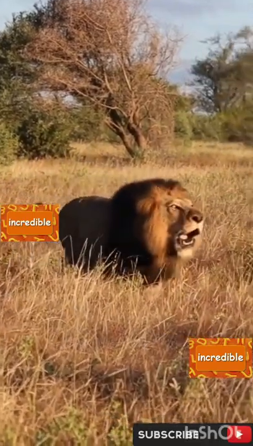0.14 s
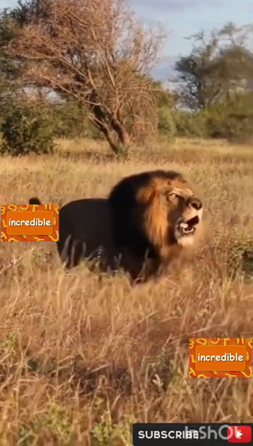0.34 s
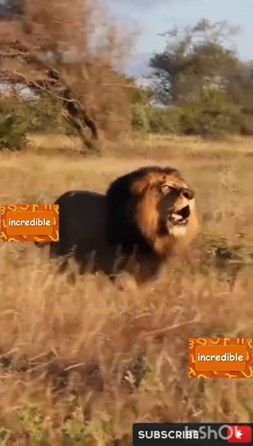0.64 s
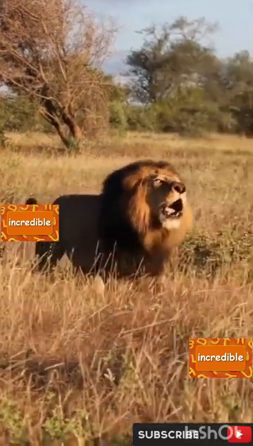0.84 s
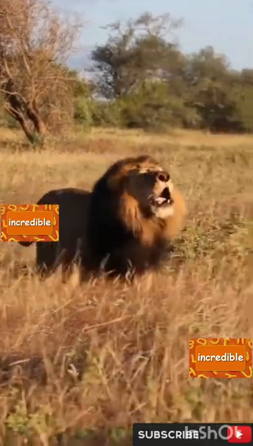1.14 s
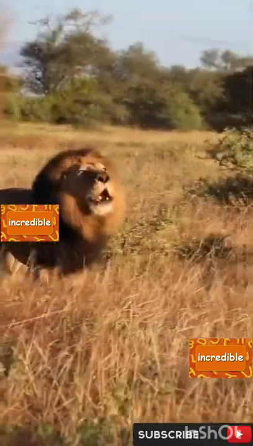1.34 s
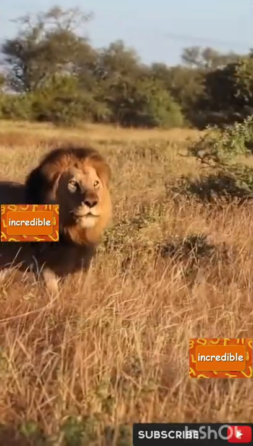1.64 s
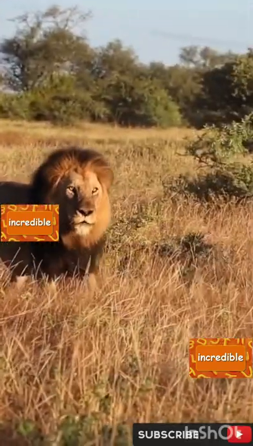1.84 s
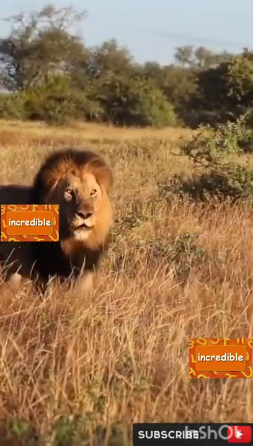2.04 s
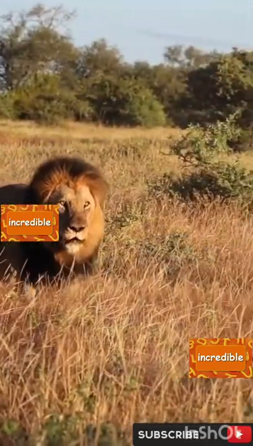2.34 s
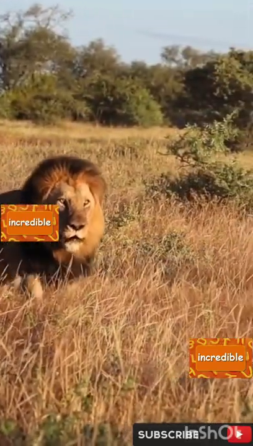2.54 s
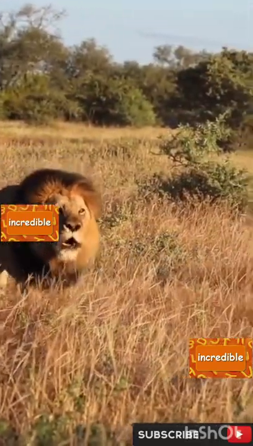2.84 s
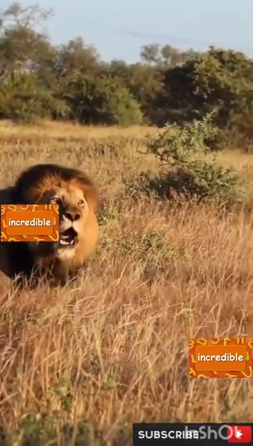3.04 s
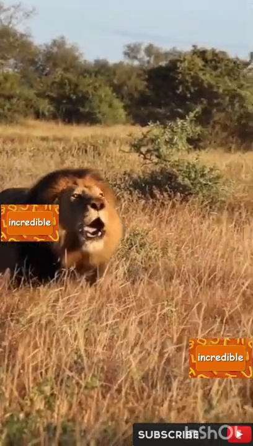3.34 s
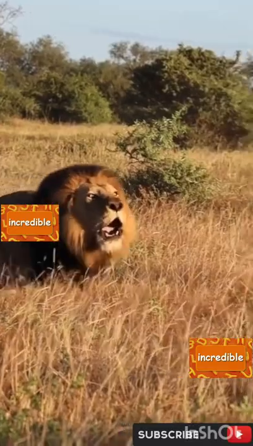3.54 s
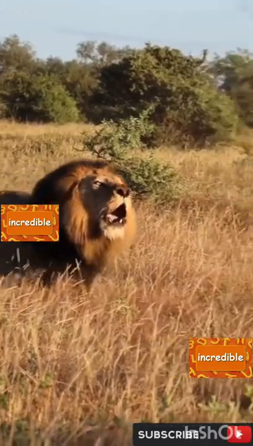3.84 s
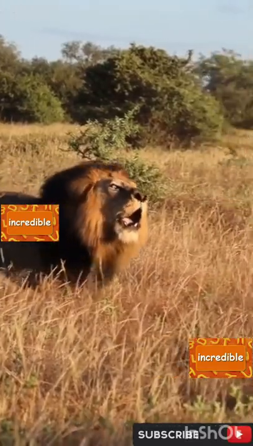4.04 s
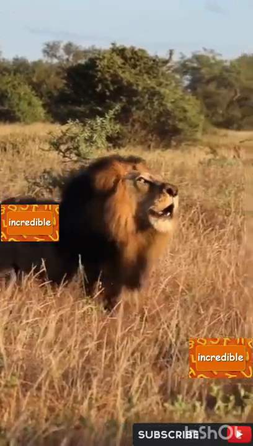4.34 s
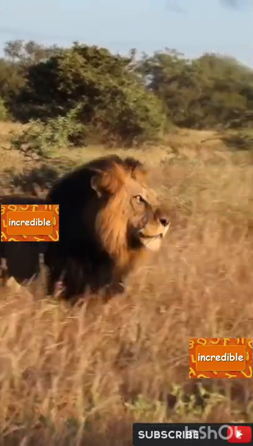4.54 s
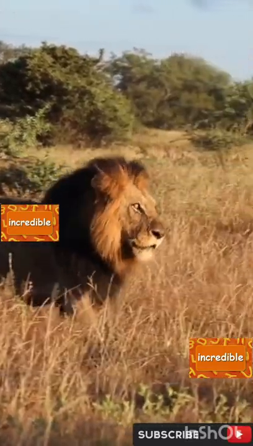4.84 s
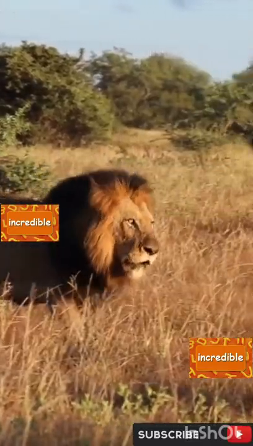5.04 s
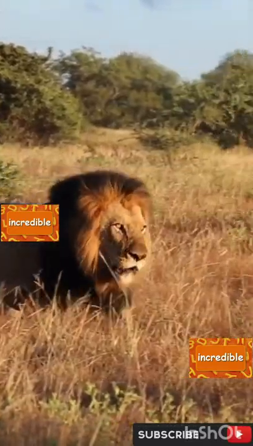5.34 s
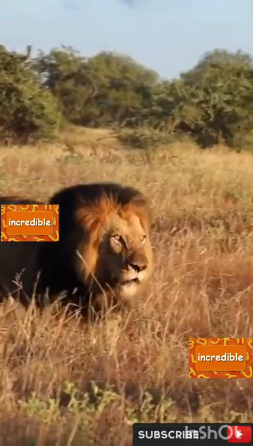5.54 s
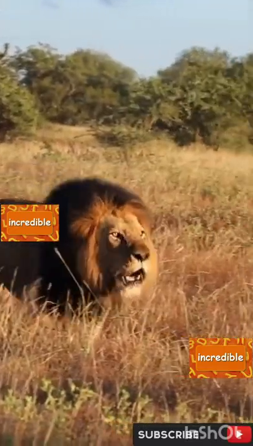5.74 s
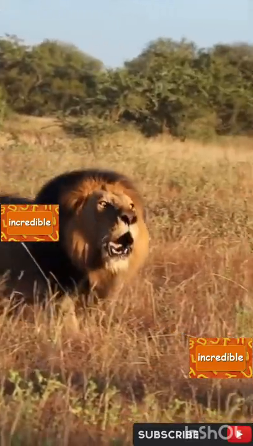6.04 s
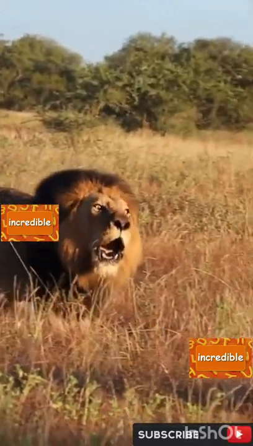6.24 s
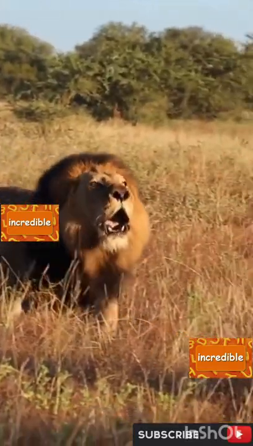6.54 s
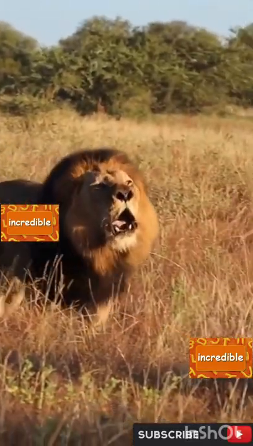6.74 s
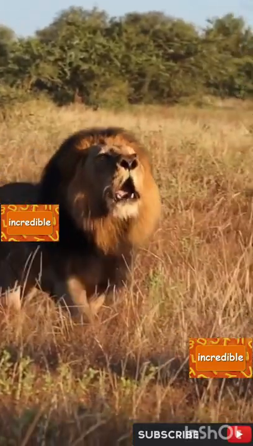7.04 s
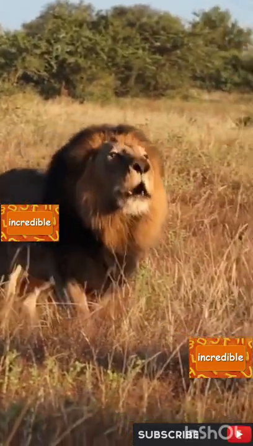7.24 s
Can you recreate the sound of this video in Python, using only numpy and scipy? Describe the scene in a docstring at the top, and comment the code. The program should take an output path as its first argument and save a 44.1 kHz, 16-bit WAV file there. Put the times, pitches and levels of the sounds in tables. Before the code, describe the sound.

Deep lion roars swell from a hollow moan to rasping growls over a quiet grassy plain, with faint bird whistles and dry grass rustling.

```python
"""Lion roaring in open grassland

A male lion some metres from a stereo microphone gives three roars and shorter grunts. Each roar has a clean
moan of steady partials, rising first, that breaks up and sinks into a hoarse chest growl: uneven slaps of
the vocal folds and gusts of air ring a long throat. Dry grass rustles as short swells of grainy noise,
birds are faint gliding sine tones, a small hollow body clicks, and soft air lies over the plain."""
import sys
import numpy as np
from scipy import signal
from scipy.fft import rfft, irfft, next_fast_len
from scipy.io import wavfile
from scipy.ndimage import uniform_filter1d

SR = 44100
rng = np.random.default_rng(int(sys.argv[2]) if len(sys.argv) > 2 else 0)


def bounce(signal):
    """Save signal as a 16-bit WAV file at the path given by the first command-line argument."""
    frames = np.transpose(np.atleast_2d(signal))
    limited = np.clip(frames, -1, 1)
    pcm = np.round(limited * 32767).astype(np.int16)
    wavfile.write(sys.argv[1], SR, pcm)


N = 325458
TIME = np.arange(N) / SR
STEPS = TIME[::SR // 1000]  # the controls of the voice are worked out about once a millisecond
FFT_SIZE = next_fast_len(N + SR // 4, real=True)
FFT_HZ = np.arange(FFT_SIZE // 2 + 1) * SR / FFT_SIZE

# Path of each moan, one list a moan: time_s, pitch_hz, fundamental_db, overtones_db (before the trims below)
MOANS = [
    [(.17, 194, -50, -64), (.32, 218.5, -40.5, -50), (.444, 232.5, -32.5, -45.5), (.53, 229.5, -31, -46),
     (.635, 237.5, -21.5, -33), (.765, 240.7, -16, -33), (.824, 234.5, -12.5, -27), (.89, 226, -11.5, -45),
     (.96, 223, -13.5, -36), (1.04, 200, -24.5, -37.5)],
    [(2.88, 197, -16, -58), (2.97, 223, -42, -47), (3.17, 247, -30, -45), (3.27, 244, -25.5, -40),
     (3.39, 236.5, -19, -32), (3.46, 241.5, -18, -35), (3.64, 239.7, -15, -27.5), (3.73, 230.5, -9.5, -37),
     (3.83, 231, -20.5, -38.5), (3.91, 220, -15.5, -47.5)],
    [(5.79, 223, -32, -43), (5.87, 234, -31, -46.5), (5.98, 238, -33, -44), (6.1, 233.5, -26.5, -41),
     (6.26, 237, -18, -35), (6.42, 243, -17, -35), (6.53, 242, -13.5, -31), (6.66, 226, -11, -35.5),
     (6.77, 218, -22.5, -40), (6.86, 200, -12, -49)],
]
# A second oscillation that joins in the middle roar: time_s, level_db (relative)
SECOND_SWING = [(3.36, -50), (3.42, -3), (3.52, -9.5), (3.58, -9), (3.66, -5), (3.72, -32.5)]
SECOND_SWING_HZ = 152
# Lines it adds above the partials: partial (number), level_db (relative)
SIDEBANDS = [(1, -17), (2, -28.5), (3, -68), (4, -47.5), (5, -72), (6, -74), (7, -31), (8, -56), (9, -35),
             (10, -43), (12, -43.5)]
# Flares of the octave as the voice cracks: time_s, half_length_s, level_db (added)
OCTAVE_FLARES = [(.9, .09, 10.5), (1.025, .045, 18), (2.898, 0.045, 11.5), (6.381, 0.033, 13.5),
                 (6.54, .04, 8)]
# the octave grows with the fundamental (dB per dB), and more under strain
OCTAVE_DB, OCTAVE_GROWTH, OCTAVE_STRAIN_DB = -23, 0.52, 3
# trims on the overtones; strain dulls the highest, which also arrive after the rest
MIDDLE_DB, BRIGHT_DB, STRAIN_DULLS_DB = 1.5, 0.24, 2
BRIGHT_LATE_DB, BRIGHT_RISE_S = 5, 0.13
JAW_SHUT_HZ, JAW_OPEN_HZ = 2170, 2550  # a mouth resonance rises and falls once in each moan


def moan(table, growl_db, jitter=0.0019, strain_jitter=0.01374, shimmer_db=0.55, fade_s=0.04):
    """The folds swing evenly: clean partials that waver and smear once the growl sets in."""
    hz, first_db, overtones_db = curves(table)
    start_s, end_s = table[0][0], table[-1][0]
    along = ramp(start_s, end_s - start_s, TIME)
    jaw_hz = JAW_SHUT_HZ + (JAW_OPEN_HZ - JAW_SHUT_HZ) * np.sin(np.pi * along)
    second_db, = curves(SECOND_SWING)
    strain = np.clip(undb(growl_db + 29) + 0.26 * undb(second_db), 0, 1.5)

    flare_db = sum(db * np.exp(-((TIME - s) / half) ** 2) for s, half, db in OCTAVE_FLARES)
    octave_db = OCTAVE_DB + OCTAVE_GROWTH * first_db + OCTAVE_STRAIN_DB * strain + flare_db
    late_db = BRIGHT_LATE_DB * np.exp(-np.maximum(TIME - start_s, 0) / BRIGHT_RISE_S)
    bright_db = overtones_db + BRIGHT_DB - STRAIN_DULLS_DB * strain - late_db

    gate = np.clip(np.minimum(TIME - start_s, end_s - TIME) / fade_s + .5, 0, 1)
    on = gate > 0
    wavering_hz = hz * (1 + (jitter + strain_jitter * strain) * walk(260))
    phase = 2 * np.pi * np.cumsum(wavering_hz)[on] / SR
    push = np.clip((first_db[on] + 32.0) / 10, 0, 1)
    out = np.zeros(N)
    # partial 1, partial 2, partials 3-6 and 7-15 each keep a level of their own
    groups = np.split(np.arange(1, 16), [1, 2, 6])
    for partials, db in zip(groups, (first_db, octave_db, overtones_db + MIDDLE_DB, bright_db)):
        k = partials[:, None]
        weight = partial_gains(k, hz[on], push, jaw_hz[on], on)
        stack = (weight * np.sin(k * phase)).sum(0) / np.sqrt((weight ** 2).sum(0) / 2)
        shimmer = shimmer_db * np.log(partials[0] + .5) * walk(65)
        out[on] += stack * undb(db + shimmer)[on]

    # the second oscillation beats with the first
    second = 2 * np.pi * np.cumsum(SECOND_SWING_HZ * (1 + 0.0338 * walk(90)))[on] / SR
    lines = sum(undb(db) * np.sin(round(k) * phase + second) for k, db in SIDEBANDS)
    out[on] += 1.65 * undb(second_db[on]) * lines
    return out * gate


# Mouth colour on the partials of a soft moan: frequency_hz, level_db (relative)
SOFT_COLOUR = [(500, 11), (700, 9.5), (860, -2), (980, 1.5), (1200, -3), (1450, 6), (1700, -12), (2000, -1),
               (2700, 5.5), (3100, -14.5), (3500, -13)]
# Mouth colour on the partials of a full moan: frequency_hz, level_db (relative)
FULL_COLOUR = [(500, 15.5), (720, 2.5), (830, -7.5), (960, 9), (1200, -3.5), (1480, -6.5), (1900, 11.5),
               (2350, 12), (2700, 12), (3050, -46), (3500, -17)]


def partial_gains(k, hz, push, jaw_hz, on, jaw_db=5, jaw_width_hz=200, wander_db=3.0):
    """The mouth opens with the push, the jaw moves one resonance, and each partial wanders in level."""
    mouth = (1 - push) * colour(SOFT_COLOUR, k * hz) + push * colour(FULL_COLOUR, k * hz)
    wander = wander_db * np.array([walk(9)[on] for _ in k])
    return mouth * undb(jaw_db * resonance(k * hz, jaw_hz, jaw_width_hz) + wander)


# Edges between the chest, throat, mouth and rasp registers of the growl: frequency_hz
REGISTER_EDGES_HZ = [100, 285, 600, 1650, 3600, 13000]
# Single hard catches in the throat: time_s, level_db (added to mouth and rasp, half of it to the throat)
CATCHES = [(1.713, 7), (1.753, 5), (1.814, 5), (2.405, 5), (3.846, 3), (4.146, 8), (5.118, 7), (5.156, 6),
           (5.327, 8), (7.071, 9), (7.111, 11), (7.278, 8)]


def growl(hz, rough, levels_db, jitter=.02, rough_jitter=.16, scatter_db=3.0, weak_db=-10, air=0.89,
          flutter_db=1, ring_t60_s=0.11, line_share=0.4):
    """Heavy folds swing almost as a sine and slap shut, strong and weak in turn; slaps and air ring the throat."""
    chest_db, low_db, mouth_db, rasp_db = levels_db
    phase = np.cumsum(hz * (1 + (.014 + .07 * rough) * walk(90))) / SR
    closure = np.maximum.accumulate(phase + (jitter + rough_jitter * rough) * walk(200))
    cycle = np.floor(closure)
    # every other slap is weak, which puts lines halfway between the partials
    slaps = np.diff(cycle, prepend=0) * undb(weak_db * (cycle % 2) + scatter_db * walk(170))
    # air gusts hardest just after each slap
    gusts = (np.exp(-(closure % 1) / .4) + .45) * rng.standard_normal(N)
    source = smear(unit(slaps), ring_t60_s) + air * unit(gusts)
    voiced = shape(source * undb(flutter_db * walk(65)), throat)

    edges = zip(REGISTER_EDGES_HZ[:4], REGISTER_EDGES_HZ[1:])
    chest, low, mouth, rasp = (steady(register(voiced, lo, hi), size=2200) for lo, hi in edges)
    hard = grit()
    mouth, rasp = patchy(mouth * hard), patchy(rasp * hard)
    # the steadier the folds, the more of the lows is clean tone
    pure = np.sqrt(2 * (1 - rough ** 2)) * np.sin(2 * np.pi * phase)
    chest = steady(pure + rough * chest)
    clean = np.clip(line_share * (1 - rough), 0, 1)
    low = np.sqrt(clean) * growl_lines(phase) + np.sqrt(1 - clean) * low

    # each catch starts at once, then fades
    catch_db = sum(db * (TIME > s - .002) * np.exp(-np.abs(TIME - s) / .012) for s, db in CATCHES)
    upper = (mouth * undb(mouth_db - 4.0) + rasp * undb(rasp_db - 4.5)) * undb(catch_db)
    voice = chest * undb(chest_db - 0.98) + low * undb(low_db - 7.5 + catch_db / 2) + upper
    return voice + rumble(chest_db, rough) + teeth_hiss(gusts, chest_db, low_db, rasp_db)


# Clean lines of a steady growl, half multiples among them: multiple (of the pitch), level_db (relative)
GROWL_LINES = [(2, -7.5), (2.5, 6.5), (3, -15.5), (3.5, -11), (4, -14.5), (4.5, -10.5)]


def growl_lines(phase):
    """Alternating strong and weak swings sound as whole and half multiples of the pitch."""
    lines = 0
    for multiple, db in GROWL_LINES:
        tone = np.sin(np.pi * round(2 * multiple) * phase + 0.6 * walk(45))
        lines = lines + undb(db + 6.5 * walk(35)) * tone
    return unit(lines)


# Resonances of the long throat: frequency_hz, width_hz (nominal), level_db (relative)
THROAT = [(165, 104, 7.5), (325, 50, -13), (389, 69, 10), (456, 19, -9), (724, 92, -12), (996, 160, -12.5),
          (1251, 197, -11.5), (1700, 150, -22), (2370, 1200, -24.5), (2680, 480, -28), (4000, 1600, -58)]


def throat(hz):
    """All resonances of the throat together, summed in power."""
    return np.sqrt(sum((undb(db) * resonance(hz, f, width)) ** 2 for f, width, db in THROAT))


def grit(rate=45, hard_db=5, decay_s=0.0055):
    """Now and then the folds slap harder: a sudden rise of the force that fades in about a cycle."""
    slaps = (rng.random(N) < rate / SR) * rng.random(N)
    force = signal.lfilter([1], [1, -np.exp(-1 / (decay_s * SR))], slaps)
    return undb(hard_db * np.minimum(force, 1))


def patchy(x, patchy_db=4.0, rate=38):
    """The rasp is uneven: every narrow band swells and fades on its own."""
    edges = np.geomspace(600, 3600, num=12)
    spectrum = rfft(x, FFT_SIZE)
    which = np.searchsorted(edges[1:-1], FFT_HZ)
    bands = (irfft(spectrum * (which == k), FFT_SIZE)[:N] for k in np.unique(which))
    return steady(sum(b * undb(patchy_db * walk(rate)) for b in bands), size=2200)


def rumble(chest_db, rough):
    """Uneven cycles leave a weak rumble under the voice."""
    noise = unit(band(rng.standard_normal(N), 59, 140, order=2))
    return noise * undb(0.42 * chest_db - 42.5 + 10 * rough + 3 * walk(14))


# Hiss of air in the mouth while growling: frequency_hz, level_db (relative)
GROWL_HISS = [(2000, -34.5), (3700, -3.5), (4400, -3.5), (5500, 3), (6700, -1), (7500, -8.5), (8700, -4),
              (10000, -16), (13000, -12)]
# Hiss of air in the mouth while moaning: frequency_hz, level_db (relative)
MOAN_HISS = [(2000, -40), (3600, -9), (5000, -3.5), (6300, 0), (7200, 4), (8200, -3.5), (10000, -8),
             (13000, -7)]
# hiss grows more slowly than the rasp level (dB per dB) and is held below it
HISS_DB, HISS_GROWTH, HISS_LIMIT_DB = -29, 0.64, -12
HISS_PRESS, HISS_PRESS_FROM_DB = .45, -20.5  # extra hiss (dB per dB) once rasp nears the throat level


def teeth_hiss(gusts, chest_db, low_db, rasp_db):
    """Air hisses at the teeth, with one colour in a growl and another in a moan."""
    deep = np.clip((chest_db + 36.0) / 14, 0, 1)
    growling = steady(shape(gusts, lambda hz: colour(GROWL_HISS, hz)))
    moaning = steady(shape(gusts, lambda hz: colour(MOAN_HISS, hz)))
    hiss = np.sqrt(deep) * growling + np.sqrt(1 - deep) * moaning
    pressed_db = HISS_PRESS * deep * np.maximum(rasp_db - low_db - HISS_PRESS_FROM_DB, 0)
    hiss_db = HISS_DB + HISS_GROWTH * rasp_db + pressed_db
    return hiss * undb(np.minimum(hiss_db, rasp_db + HISS_LIMIT_DB))


def effort():
    """All pushes share one throat: powers add, and chest power weighs each one's pitch and roughness."""
    pushes = [growl_push(*row) for row in GROWLS] + [short_push(*row) for row in SHORT_PUSHES]
    pushes += [whine_push(*row) for row in WHINES] + [breathy_push(table) for table in MOANS]
    hz, rough, levels_db = map(np.array, zip(*pushes))
    power = undb(np.maximum(levels_db, -120)) ** 2
    share = power[:, 0] / power[:, 0].sum(0)

    def per_sample(control):
        """Join the millisecond steps by straight lines."""
        return np.interp(TIME, STEPS, control)

    pitch_hz = per_sample((share * hz).sum(0))
    roughness = per_sample(np.clip((share * rough).sum(0), 0, 1))
    return pitch_hz, roughness, [per_sample(db) for db in 10 * np.log10(power.sum(0))]


# Deep growls and grunts: start_s, attack_s, hold_s, release_s, first_pitch_hz, held_pitch_hz,
# chest_db, throat_db, mouth_db, rasp_db (efforts, before the register trims in growl)
GROWLS = [(-.04, 0.032, .06, .08, 215.5, 144, -8, -23, -32.5, -54),
          (0.999, 0.072, .27, .21, 224.8, 167.4, -10, -14.5, -30, -36),
          (1.692, .06, .29, 0.2, 158.2, 159.6, -10.5, -16.5, -30, -42.5),
          (2.538, 0.076, 0.16, 0.28, 200.3, 163, -15, -22.5, -42, -48.5),
          (3.97, 0.074, 0.22, 0.2, 189.7, 168.9, -12, -17.5, -30.5, -39),
          (5.111, .08, .11, .25, 138.1, 160.8, -8.5, -20.5, -33.5, -47.5),
          (5.68, 0.063, .15, .26, 204.5, 159, -16, -29, -42, -50.5),
          (6.839, 0.06, .24, 0.22, 212.8, 171, -13.5, -19.5, -31.5, -42)]
SETTLE_S, LIFT_HZ, SINK_HZ = .06, 16, 31.965  # pitch settles, lifts as the push ends, then sinks
HELD_ROUGH, ONSET_ROUGH, RELEASE_ROUGH = .04, .6, .65  # held roughness; what onset and release add
SAG_DB_PER_S, CHEST_FALL_DB, THROAT_FALL_DB = 7, 17, 7  # the voice tires, then falls over the release
# the last air has more rasp, until the throat shuts this far into the release (share)
LAST_AIR_DB, SHUT_SHARE, SHUT_DB = 5.5, 0.61, 50


def growl_push(start, attack, hold, release, first_hz, held_hz, chest, throat, mouth, rasp,
               lift_at=.22, lift_width=.2, air_at=0.39, air_width=0.38):
    """One growl settles on a steady note, then the chest gives way and rasping air outlasts it."""
    age = np.maximum(STEPS - start, 0)
    spent = (STEPS - start - attack - hold) / release
    fall, fresh = np.maximum(spent, 0), np.exp(-age / SETTLE_S)
    lift_hz = LIFT_HZ * np.exp(-((spent - lift_at) / lift_width) ** 2)
    hz = held_hz + (first_hz - held_hz) * fresh + lift_hz - SINK_HZ * np.minimum(fall, 1)
    rough = HELD_ROUGH + ONSET_ROUGH * fresh + RELEASE_ROUGH * np.minimum(2 * fall, 1)

    onset = -20 * np.maximum(start + attack - STEPS, 0) / attack
    sag = SAG_DB_PER_S * np.maximum(age - attack, 0)
    chest_db = chest + onset - sag - CHEST_FALL_DB * fall - SHUT_DB * np.maximum(spent - 1, 0)
    air = onset - SHUT_DB * np.maximum(spent - SHUT_SHARE, 0)
    rasp_db = rasp + air + LAST_AIR_DB * np.exp(-((spent - air_at) / air_width) ** 2)
    return hz, rough, [chest_db, throat + air - THROAT_FALL_DB * fall, mouth + air, rasp_db]


# Short extra pushes of the voice, from faint breathy tails and onsets to loud hoarse bursts:
# start_s, length_s, pitch_hz, roughness (1 = fully uneven),
# chest_db, throat_db, mouth_db, rasp_db (efforts, before the register trims in growl)
SHORT_PUSHES = [(0, 0.018, 170, .2, -25, -14.5, -26, -33.5),
                (0.106, 0.041, 120.4, 0.32, -28, -32.5, -50, -54),
                (.23, .06, 189, 1.01, -54, -44, -57, -54), (.33, .2, 190, .9, -54, -39, -51.5, -47),
                (.86, 0.087, 205.6, 0.74, -46, -28, -34, -42),
                (0.969, 0.076, 206.2, 0.36, -36, -17, -25, -38),
                (1.658, 0.022, 147.6, 0.56, -44, -56, -59.5, -66),
                (1.722, 0.025, 160.6, .5, -18.5, -35, -43, -66),
                (2.067, .04, 200, .45, -18, -14, -35.5, -36),
                (2.88, 0.044, 198.2, 0.52, -29, -20, -45, -64), (3.049, .28, 150, 0.88, -41, -42, -52, -48),
                (3.37, .03, 150.1, .8, -34, -24, -37, -38), (3.42, 0.095, 165, 0.86, -31, -8, -29, -35.5),
                (3.561, .16, 151, 0.95, -54, -19.5, -34.5, -43),
                (3.779, .12, 157.7, 0.42, -14, -15.5, -24, -35.5),
                (3.929, .07, 180.2, 0.71, -19, -13, -26, -33.5),
                (4.441, .03, 136.9, 0.51, -31, -27, -45, -48.5),
                (5.12, .02, 148.8, .7, -21, -23.5, -44.5, -52),
                (5.175, .035, 150.5, 0.31, -17, -19.5, -27, -46),
                (5.669, 0.08, 150.1, 0.74, -26, -19.5, -41.5, -47),
                (6.07, .15, 125.8, 0.79, -34, -37, -49, -54),
                (6.32, 0.059, 158, 0.36, -15.5, -20.5, -23, -37.5),
                (6.501, 0.11, 159.5, 0.84, -48.5, -23, -33.5, -48),
                (6.67, 0.16, 155.6, 0.58, -18, -15.5, -26, -39),
                (6.91, .04, 178.8, 0.19, -12, -29, -43, -47)]
SHORT_ATTACK_S, SHORT_RELEASE_S = .035, .06


def short_push(start, length, hz, rough, *levels_db):
    """A short extra push of the voice, with its own pitch and roughness held throughout."""
    db = swell(start, length, SHORT_ATTACK_S, SHORT_RELEASE_S)
    return np.full_like(STEPS, hz), np.full_like(STEPS, rough), np.add.outer(levels_db, db)


# Soft whines as the lion draws air: start_s, length_s, first_pitch_hz, last_pitch_hz,
# chest_db, throat_db (efforts, before the register trims in growl)
WHINES = [(2.299, .27, 255.7, 219.4, -35, -30.5), (4.62, .18, 174, 204.1, -49.5, -53.5),
          (4.83, .26, 220.1, 230.8, -42, -45), (5.569, .08, 230.4, 211.2, -25.5, -32)]
WHINE_ROUGH, WHINE_FADE_S, WHINE_SWELL_DB_PER_S = .5, .08, 20.5
WHINE_MOUTH_DB, WHINE_RASP_DB = -13.5, -20.5  # against the throat


def whine_push(start, length, first_hz, last_hz, chest, throat):
    """A soft glide that grows as the lungs fill."""
    along = ramp(start, length)
    db = swell(start, length, WHINE_FADE_S, WHINE_FADE_S) + WHINE_SWELL_DB_PER_S * length * (along - .5)
    levels_db = [chest, throat, throat + WHINE_MOUTH_DB, throat + WHINE_RASP_DB]
    hz = first_hz + (last_hz - first_hz) * along
    return hz, np.full_like(STEPS, WHINE_ROUGH), np.add.outer(levels_db, db)


# Breathy, rough voice under a moan, against its overtones, in chest, throat, mouth and rasp:
# level_db (efforts, before the register trims in growl)
BREATHY_DB = [-24, -9.5, -13.5, -6.5]


def breathy_push(table, fade_s=.06):
    """Breathy, rough voice under a moan, following its pitch and overtones."""
    s, hz, _, overtones_db = np.transpose(table)
    db = np.interp(STEPS, s, overtones_db) + swell(s[0], s[-1] - s[0], fade_s, fade_s)
    return np.interp(STEPS, s, hz), np.ones_like(STEPS), np.add.outer(BREATHY_DB, db)


# The lion brushes through dry grass: time_s, half_length_s, level_db
SWISHES = [(.28, 0.034, -58), (.75, 0.078, -49), (1.93, 0.062, -51), (2.08, 0.054, -50.5),
           (3.5, 0.089, -51), (5.03, .15, -63), (5.93, .03, -52), (6.38, 0.079, -46)]
# Colour of stalks on the coat: frequency_hz, level_db (relative)
SWISH_COLOUR = [(2500, -30), (4500, -9.5), (7200, 8), (9000, 0.5), (13000, -11.5)]


def swishes(grain_db=3, grain_rate=160, spread=0.35):
    """Stalks slide over the coat: short swells of grainy hiss."""
    force = sum(undb(db) * np.exp(-((TIME - s) / half) ** 2) for s, half, db in SWISHES)
    noise = rng.standard_normal(N) + spread * rng.standard_normal((2, N))
    hiss = shape(noise, lambda hz: colour(SWISH_COLOUR, hz))
    return force * unit(hiss * undb(grain_db * walk(grain_rate)))


# Small hollow clicks: time_s, level_db (of the blow, before the ring and band-pass)
CLICKS = [(4.6497, -36.5), (4.6963, -37), (4.795, -34), (4.8956, -33)]
# What they ring with: frequency_hz, level_db (relative), t60_s
CLICK_MODES = [(1085.6, 4, 0.025), (1171, -20, 0.021), (831, -6, 0.022)]


def clicks(lead_s=0.014, tick_db=-13):
    """A light tick, then a firmer click, both ringing the same small hollow body."""
    blows = np.zeros(N)
    for s, db in CLICKS:
        blows[int(s * SR)] += undb(db)
        blows[int((s - lead_s) * SR)] += undb(db + tick_db)
    t = TIME[:SR // 10]
    ring = sum(undb(db - 60 * t / t60) * np.sin(2 * np.pi * hz * t) for hz, db, t60 in CLICK_MODES)
    return band(signal.fftconvolve(blows, ring)[:N], 493, 1260)


# A bird's whistle: time_s, pitch_hz, level_db
WHISTLE = [(1.54, 4818, -79), (1.57, 5030, -62), (1.6, 5200, -66), (1.64, 4997, -64), (1.68, 4770, -56.5),
           (1.74, 4657, -57), (1.78, 4710, -77)]
# A far bird's high notes, one list each: time_s, pitch_hz, level_db
FAR_WHISTLES = [
    [(.12, 2950, -83), (.16, 3000, -56), (.21, 3070, -50), (.23, 2940, -55), (.29, 3000, -44),
     (.34, 3060, -76)],
    [(4.52, 3136, -85), (4.6, 3130, -73), (4.72, 3204, -68), (4.86, 3186, -70), (4.92, 2950, -62),
     (4.99, 3077, -63), (5.06, 3088, -66), (5.12, 3086, -73)],
]


def bird(table):
    """One thin slurred whistle: a sine that wavers in pitch and level."""
    hz, db = curves(table)
    sounding = (TIME > table[0][0]) & (TIME < table[-1][0])
    phase = 2 * np.pi * np.cumsum(hz * (1 + 0.0034 * walk(120))) / SR
    return sounding * undb(db + 3.3 * walk(75)) * np.sin(phase)


# Colour of the soft air over the plain: frequency_hz, level_db (relative)
PLAIN_COLOUR = [(25, -7), (70, -29.5), (200, -15.5), (500, -24.5), (1200, -22.5), (3000, -19.5),
                (4500, -29.5), (8000, -19), (13000, -28)]


def plain(air_db=-61, grass_db=-73, crackle_db=4):
    """Soft moving air as coloured noise, and dry grass stalks as random ticks."""
    noise = rng.standard_normal(N) + .5 * rng.standard_normal((2, N))
    air = unit(shape(noise, lambda hz: colour(PLAIN_COLOUR, hz))) * undb(air_db + 3.3 * walk(3.9))
    # about 250 ticks a second, a few of them much stronger
    strength = undb(crackle_db * np.minimum(rng.exponential(size=N), 4))
    stalks = (rng.random(N) < 250 / SR) * strength
    grass = unit(band(stalks * (1 + .5 * rng.standard_normal((2, N))), 2700, 14000, order=2))
    return air + grass * undb(grass_db + 2 * walk(3))


def surroundings(x, t60_s=0.091, scatter_db=-6):
    """Grass and bushes scatter sound differently to each side; the lion stands a little to the right."""
    late = np.pad(smear(x, t60_s), (SR // 150, 0))[:N] * undb(scatter_db)
    scattered = [(60, -8.5), (170, -22.5), (400, -16.0), (700, -24),
                 (1200, -7.5), (2400, -0.5), (4000, 6.0), (9000, -4)]  # (Hz, dB)
    to_right = [(170, -18), (900, -29.0), (2200, -10), (5000, -12), (10000, -30.0)]  # (Hz, dB)
    side = shape(late, lambda hz: colour(scattered, hz)) - shape(x, lambda hz: colour(to_right, hz))
    return np.array([x + side, x - side])


def undb(db):
    """Decibels to gain."""
    return 10 ** (np.asarray(db) / 20)


def curves(table):
    """The columns of a table, joined by straight lines in time."""
    s, *columns = np.transpose(table)
    return [np.interp(TIME, s, c) for c in columns]


def colour(points, hz):
    """Gain of a (Hz, dB) spectrum at the given frequencies."""
    f, db = np.transpose(points)
    return undb(np.interp(np.log(hz + 1), np.log(f), db))


def shape(x, response):
    """Filter by a function of frequency."""
    return irfft(rfft(x, FFT_SIZE) * response(FFT_HZ), FFT_SIZE)[..., :N]


def band(x, lo_hz, hi_hz, order=4):
    """Butterworth band-pass."""
    return signal.sosfilt(signal.butter(order, [lo_hz, hi_hz], "band", fs=SR, output="sos"), x)


def register(x, lo_hz, hi_hz):
    """A steep slice of the voice; neighbouring slices add up without a gap."""
    return shape(x, lambda hz: 1 / (1 + (hz / hi_hz) ** 10) - 1 / (1 + (hz / lo_hz) ** 10))


def resonance(hz, centre_hz, width_hz):
    """Gain of a resonance with steep skirts."""
    return 1 / (1 + ((hz ** 2 - centre_hz ** 2) / (1.345 * width_hz * hz + 1)) ** 2)


def smear(x, t60_s):
    """A short, dense ring with the energy kept."""
    t = TIME[:SR // 4]
    ring = rng.standard_normal(len(t)) * undb(-60 * t / t60_s)
    response = rfft(ring, FFT_SIZE)
    # its broad colour stays even; only narrow peaks and dips remain
    response /= np.sqrt(uniform_filter1d(np.abs(response) ** 2, size=940))
    return irfft(rfft(x, FFT_SIZE) * response, FFT_SIZE)[:N]


def unit(x):
    """Scale to a standard deviation of 1."""
    return x / np.std(x)


def steady(x, size=3000):
    """Hold the slow level at 1 and keep the fast flutter."""
    slow_power = uniform_filter1d(uniform_filter1d(x * x, size), size // 2)
    return x / np.sqrt(slow_power + 1e-12)


def walk(rate):
    """Smooth chance with spread 1, from this many random values a second."""
    k = max(int(SR / rate), 2)
    return unit(uniform_filter1d(np.repeat(rng.standard_normal(N // k + 1), k)[:N], k))


def ramp(start_s, length_s, t=STEPS):
    """0 before the start, rising evenly to 1."""
    return np.clip((t - start_s) / length_s, 0, 1)


def swell(start_s, length_s, attack_s, release_s):
    """Envelope in dB: full for the length, 20 dB down one attack before it and one release after it."""
    before = np.maximum(start_s - STEPS, 0) / attack_s
    after = np.maximum(STEPS - start_s - length_s, 0) / release_s
    return -20 * (before + after)


def scene():
    """Lion, clicks and birds over the quiet plain, with grass brushed in passing."""
    hz, rough, levels_db = effort()
    mouth_db = levels_db[2]
    lion = sum(moan(table, mouth_db) for table in MOANS) + growl(hz, rough, levels_db)
    birds = sum(bird(table) for table in [WHISTLE, *FAR_WHISTLES])
    return surroundings(lion + clicks() + birds) + plain() + swishes()


TOP_HZ = 13300


def record(dry):
    """The recorder cuts the top with a steep low-pass."""
    return signal.sosfilt(signal.ellip(8, .2, 70, TOP_HZ, fs=SR, output="sos"), dry)


dry = scene()
out = record(dry)
bounce(out)
```